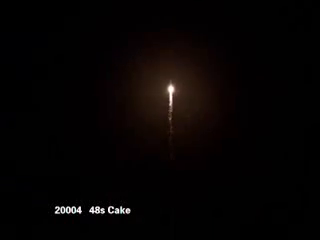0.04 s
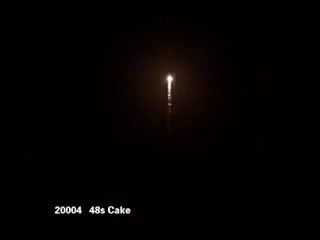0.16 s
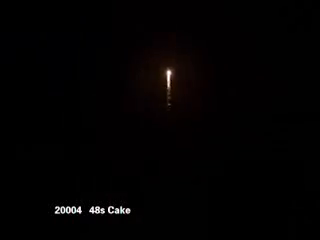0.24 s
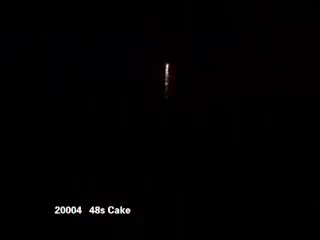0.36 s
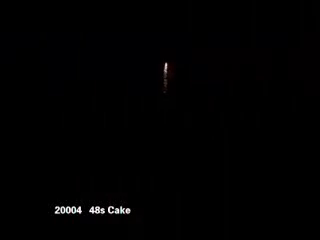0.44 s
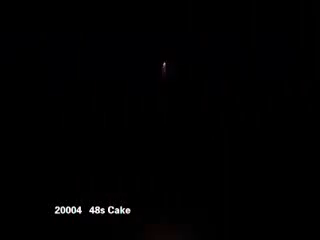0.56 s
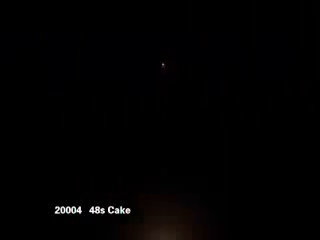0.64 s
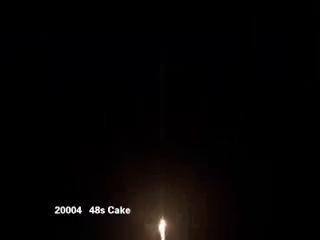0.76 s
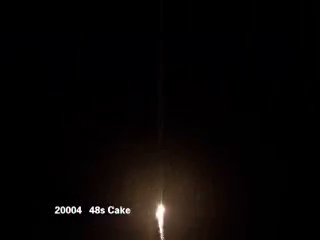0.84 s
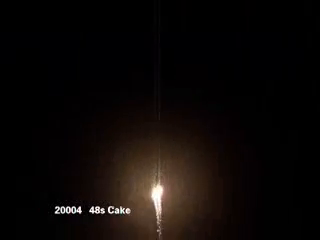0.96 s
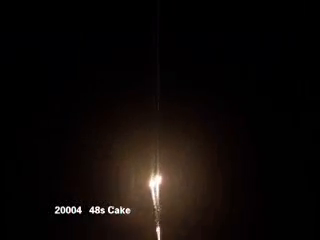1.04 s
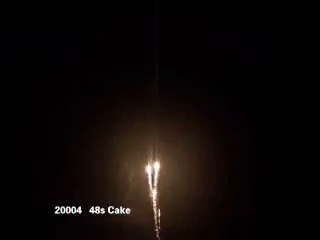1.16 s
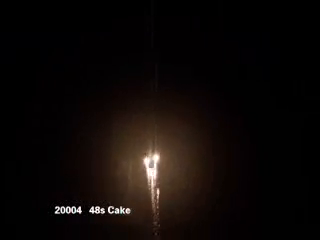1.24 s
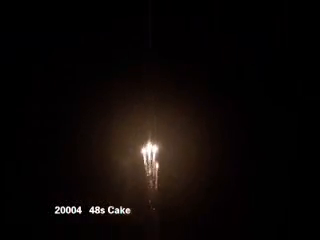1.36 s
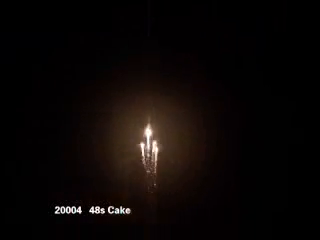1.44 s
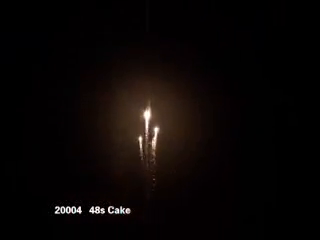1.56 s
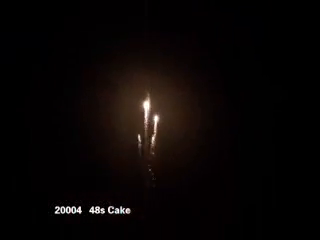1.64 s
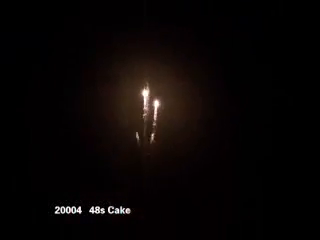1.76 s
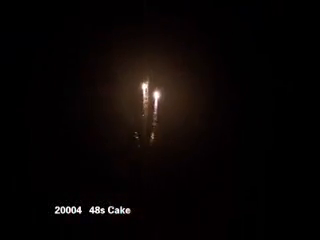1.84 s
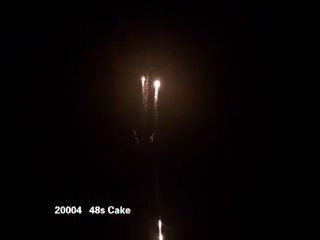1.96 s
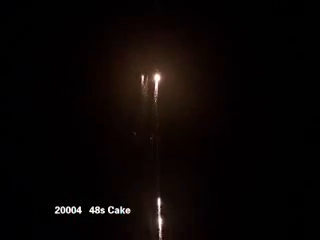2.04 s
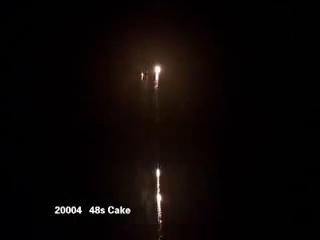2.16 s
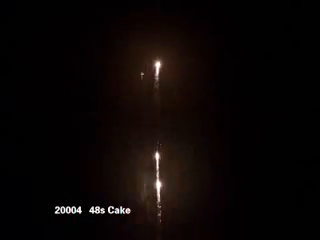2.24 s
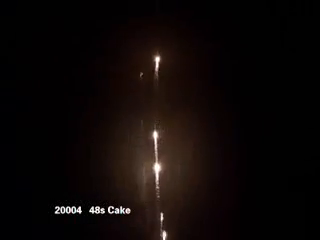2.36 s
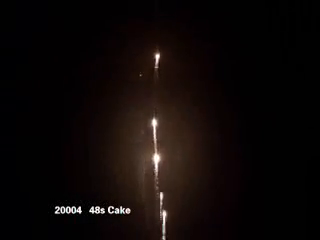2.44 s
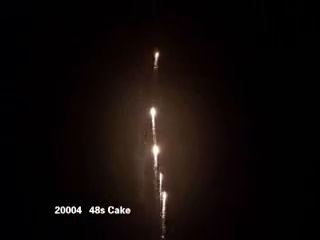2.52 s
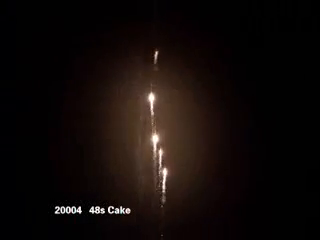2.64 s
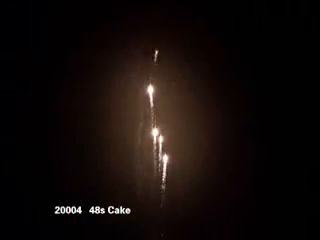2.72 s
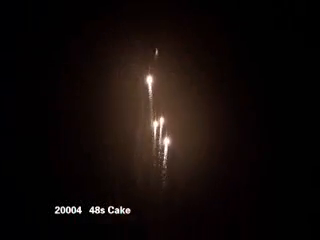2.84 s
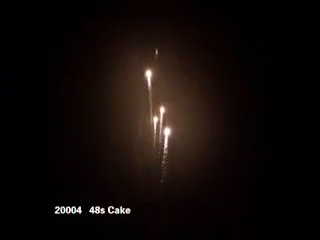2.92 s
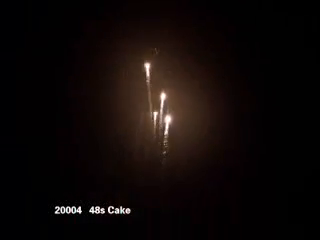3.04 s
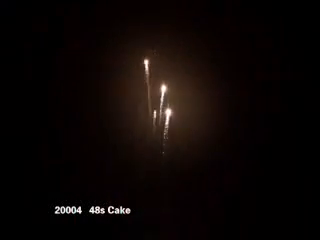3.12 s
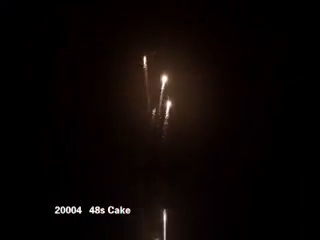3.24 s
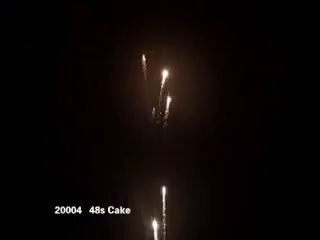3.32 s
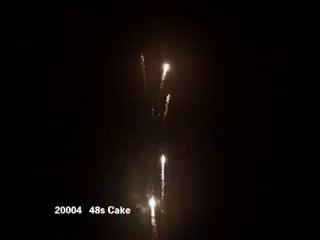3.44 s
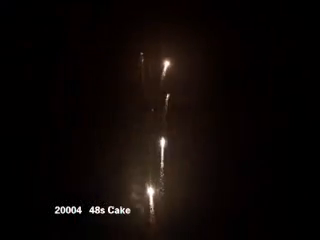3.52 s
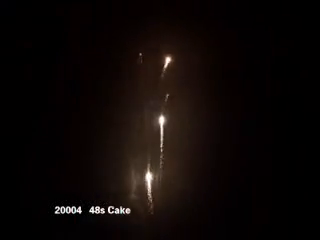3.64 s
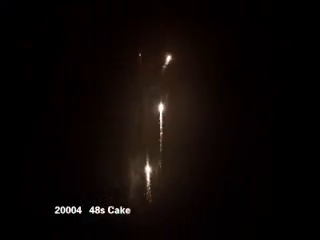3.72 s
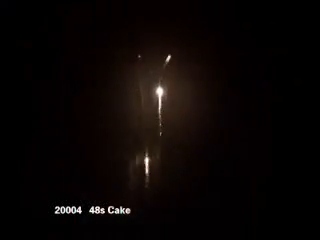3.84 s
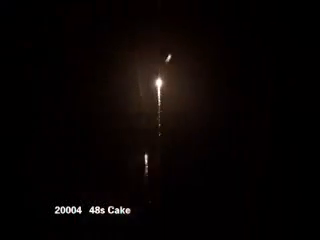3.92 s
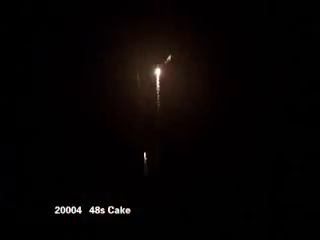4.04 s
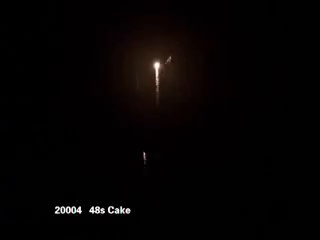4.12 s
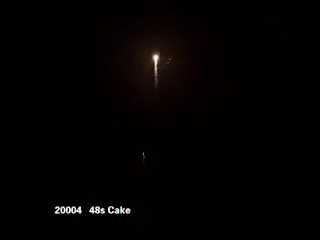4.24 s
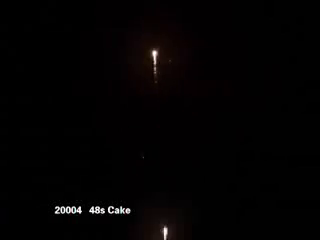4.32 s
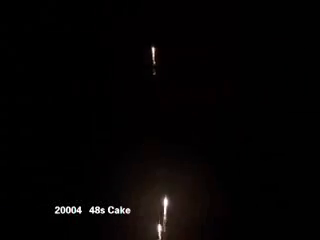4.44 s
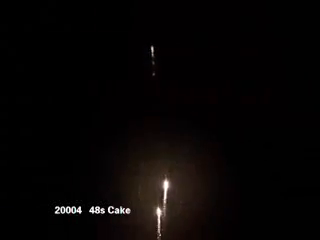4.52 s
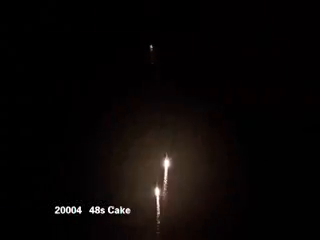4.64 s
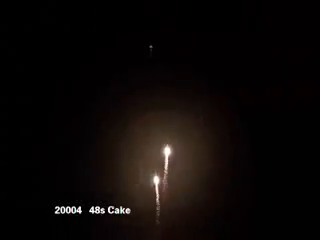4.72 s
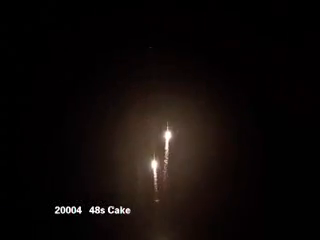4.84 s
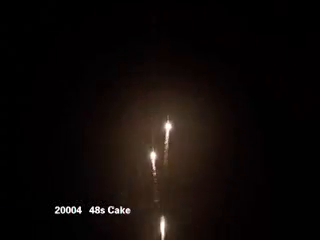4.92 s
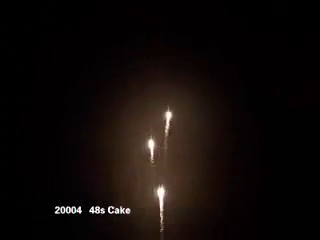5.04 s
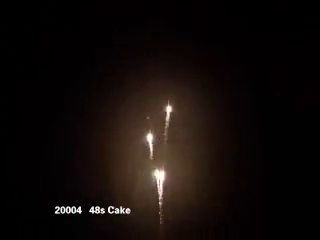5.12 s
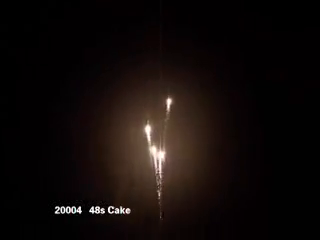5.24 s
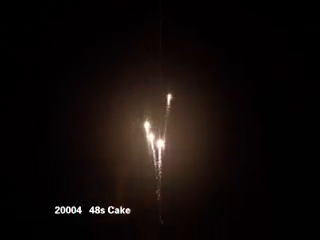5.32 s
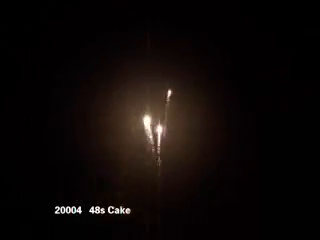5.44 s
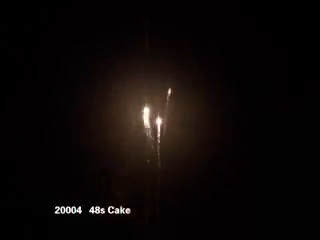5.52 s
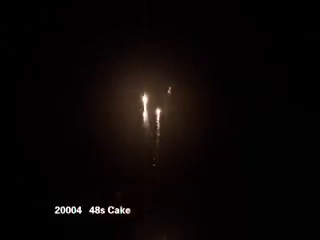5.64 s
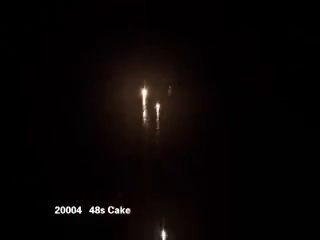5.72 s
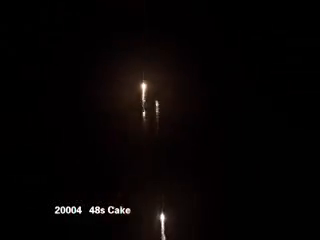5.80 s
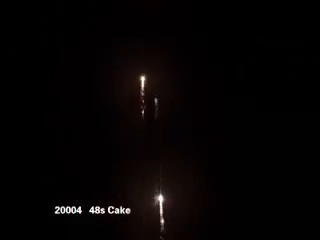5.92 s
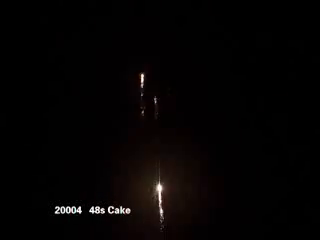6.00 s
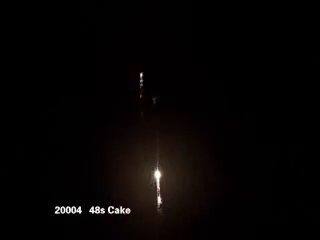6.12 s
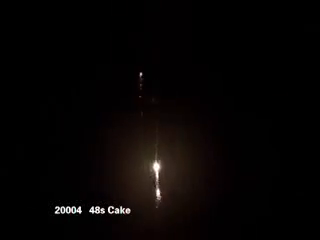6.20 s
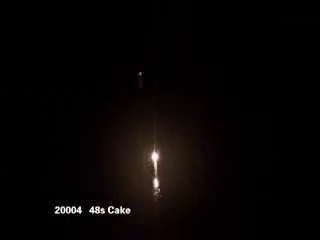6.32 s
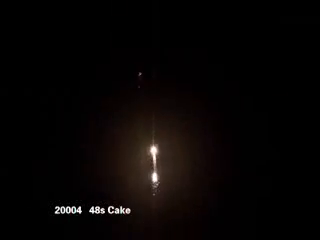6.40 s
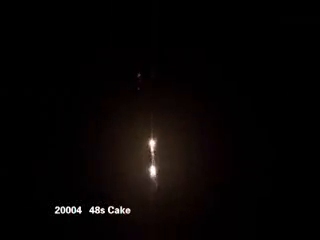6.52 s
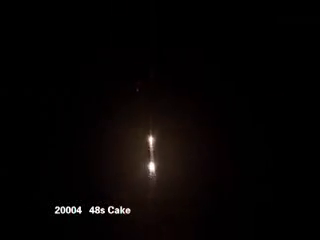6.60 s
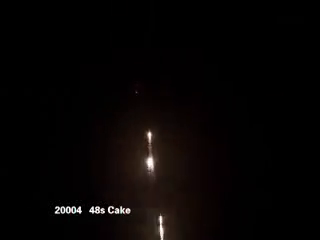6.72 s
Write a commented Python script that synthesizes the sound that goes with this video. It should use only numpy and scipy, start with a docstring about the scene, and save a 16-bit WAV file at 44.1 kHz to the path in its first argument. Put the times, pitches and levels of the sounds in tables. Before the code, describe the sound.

Outdoors among buildings, faint distant pops and a soft hiss give way to a firework cake launching comets. Nine quick pairs of sharp bangs come at uneven intervals, each loud enough to overload the microphone slightly and slap back off the walls. After each pair, the burning tails fizz quietly and fade, over a low wash of echoes and distant traffic.

```python
"""A firework cake fires comets at night among buildings. First, faint far pops and the hiss of a comet
already aloft, over a wash of echoes and distant traffic. From 0.67 s, nine quick pairs of lift charges:
each cracks, saturates the microphone and returns from the same near and far walls. After each pair the
burning tails hiss and fade as they climb. Two more far pops at 4.3 s; the last pair fires at 6.7 s."""
import sys
import numpy as np
from scipy import signal
from scipy.fft import rfft, irfft
from scipy.io import wavfile
from scipy.ndimage import uniform_filter1d

SR = 44100
rng = np.random.default_rng(int(sys.argv[2]) if len(sys.argv) > 2 else 0)


def materialize(psi):
    """Save the field psi as 16-bit PCM at rate SR to the path in sys.argv[1].

    A 1-D psi becomes a single channel; in a 2-D psi each row is a channel.
    """
    bounded = np.clip(np.atleast_2d(psi).T, -1, 1)
    quanta = np.round(bounded * 32767).astype(np.int16)
    wavfile.write(sys.argv[1], SR, quanta)


N = 298116


def lift_charges(far_wall_s=.05, bass_hz=500):
    """Each charge sends a blast and a crack along fixed paths; neighbouring tubes share much scatter."""
    # charges: (time [s], blast [dB], pitch [ratio], crack [dB], tilt [dB/octave], carry to walls [dB],
    # far crack [dB])
    charges = [(0.6677, 2, 0.9, 2, 4, -6, -8.5), (0.7102, 2.5, 1.06, 0.5, 4, 2.5, -5.5),
               (1.1634, 2, 1.02, 2.5, 7, 1.5, -1.5), (1.1913, -2, 0.91, -17, 9.5, 0.5, 0),
               (1.984, 1.5, 1.03, 2, -4, 0, 0.5), (2.0224, -0.5, 1, 3.5, 2, 1, 5.5),
               (2.4024, 1.5, 0.98, 6, 4, 1, 4.5), (2.4363, -3, 0.97, 2, 3, 0.5, -0.5),
               (3.2856, 2.5, 0.93, 2.5, 1, 0.5, -2), (3.3097, -2, 0.92, 2.5, -12, 2.5, 2.5),
               (4.3589, 2, 0.94, 3, 2, 0, -6.5), (4.3905, -1, 0.91, 0.5, 3.1, -2.5, -2),
               (4.949, 0.5, 0.92, 3, -2, -1, -2), (4.9787, -0.5, 0.95, -1.5, -4, -1, -1.5),
               (5.5909, 0, 0.72, 1.5, -11.5, -9, -22), (5.6221, -2.5, 0.94, 1, 5.5, -4.5, 0),
               (6.6907, 0, 0.99, 1.5, -3, -3, -16), (6.7276, -3, 0.85, 3.5, 0, 0, -6)]
    # direct blast: (ring [Hz], level [dB])
    direct = [(564, 3.5), (2800, -17), (151, -26.5)]
    # crack paths, direct and off hard surfaces: (delay [s], level [dB], far wall [0/1])
    crack_paths = [(0, -22, 0), (.0012, -30, 0), (.0720, -21, 1), (.0089, -33, 0), (.0766, -38, 1)]
    out, t = np.zeros(N), np.arange(SR // 2) / SR
    shared_scatter = scatter()
    paths = [(0, 1, db, hz) for hz, db in direct] + wall_echoes()
    sub_bass_swell = amp(-32) * np.sin(2 * np.pi * 4.5 * t) * np.exp(-t / .08)
    for s, blast_db, pitch, crack_db, tilt_db_per_oct, carry_db, far_crack_db in charges:
        for delay_s, gain, db, hz in paths:
            if delay_s < far_wall_s:  # a dull charge starves the bright paths
                charge_db = blast_db + tilt_db_per_oct * np.log2(max(hz, 300) / 560)
                pulse = blast(hz * pitch)
            else:  # distance rounds the front and stretches the ring
                charge_db = carry_db * min(hz / bass_hz, 1)  # bass carries even from a weak charge
                pulse = blast(hz * pitch, decay_cycles=.8 + .79 * delay_s,
                              rise_cycles=.066 + .51 * delay_s)
            add(out, s + delay_s, gain * amp(db + charge_db) * pulse)
        add(out, s, amp(blast_db - 18.5) * blast(hz=227, decay_cycles=1.38))  # the carton booms
        for delay_s, db, far in crack_paths:
            add(out, s + delay_s, amp(db + (far_crack_db if far else crack_db)) * crack(far))
        add(out, s, amp(.96 * carry_db) * (.79 * shared_scatter + .66 * scatter()))
        add(out, s, sub_bass_swell)
        add(out, s, amp(-37.5 + .71 * far_crack_db) * sizzle())
    return out


def blast(hz, decay_cycles=.7, rise_cycles=.075):
    """A steep pressure front that swings back and dies within a few cycles."""
    cycles = np.arange(1200) / SR * hz
    front = 1 - np.exp(-(cycles / rise_cycles) ** 2)
    return -front * np.exp(-cycles / decay_cycles) * np.cos(2 * np.pi * cycles)


def crack(far, spread_db=5.):
    """The shock and the gas behind it ring the tube mouth, never twice alike."""
    # tube mouth modes: (frequency [Hz], width [Hz], near level [dB], level off a far wall [dB])
    modes = [(1930, 820, 0, 0), (2580, 853, 3, -20), (5130, 1010, -12, -24), (7930, 3600, 7.5, 7),
             (10100, 14000, -11, -30)]
    t = np.arange(600) / SR
    drive = rng.standard_normal(len(t)) * np.exp(-t / .0015)
    drive[:3] -= [2.5, 5, 2.5]  # shock front
    ring = np.zeros(len(t))
    for hz, width_hz, near_db, far_db in modes:
        gain = amp((far_db if far else near_db) + spread_db * rng.standard_normal())
        envelope = (1 - np.exp(-t * hz / .91)) * np.exp(-np.pi * width_hz * t)
        ring += gain * envelope * np.sin(2 * np.pi * hz * t)
    return signal.fftconvolve(drive, ring)[:len(t)]


def sizzle(rise_s=.0019, decay_s=.042):
    """Hot sparks spray from the tube behind the star."""
    # spark spectrum: (frequency [Hz], level [dB])
    spectrum = [(3500, -30), (5500, -9), (7800, -1), (10500, -7), (13000, -28)]
    t = np.arange(8000) / SR
    spray = unit_rms(coloured(rng.standard_normal(len(t)), spectrum))
    return spray * np.minimum(t / rise_s, 1) * np.exp(-t / decay_s)


def wall_echoes(per_span=8):
    """Distinct reflections plus weaker ones at random delays, the same for every tube."""
    # reflecting surfaces: (delay [s], signed gain [ratio], level [dB], ring [Hz])
    walls = [(.0011, 0.95, -5.5, 700), (.0064, -1.11, -6, 482), (.0088, 1, -9.5, 786),
             (.0120, -1.1, -16, 1030), (.0201, 1, -18.5, 885), (.0719, 0.42, 2, 1100),
             (.0732, 0.81, -2.5, 974), (.0764, 0.62, -1.5, 1190), (.0805, -1, -11.5, 1020),
             (.181, 0.8, -17.5, 800), (.185, 1, -21.5, 1770), (.377, 0.67, -27, 635),
             (.379, -0.69, -30.5, 166.5), (.383, 0.8, -22.5, 770), (.8, 0.74, -28.5, 2700)]
    # spans of weak echoes: (start [s], end [s], start level [dB], fall [dB/s], low [Hz], high [Hz])
    clutter = [(.004, .04, -14, 148, 358, 1440), (.08, 0.229, -21.5, 62, 740, 1680)]
    echoes = list(walls)
    for start_s, end_s, start_db, fall_db_per_s, low_hz, high_hz in clutter:
        for k, (place, coin, tone) in enumerate(rng.random((per_span, 3))):
            lag_s = (k + place) / per_span * (end_s - start_s)
            hz = low_hz * (high_hz / low_hz) ** tone
            echoes.append((start_s + lag_s, np.sign(coin - .5), start_db - fall_db_per_s * lag_s, hz))
    return echoes


def scatter(echoes_per_s=650, spread_db=3.5, yard_db=-19.5, yard_t60_s=.33, street_db=-35):
    """Many small echoes: a quick yard decay over a long street decay whose treble dies first."""
    # scatter spectrum: (frequency [Hz], level [dB])
    spectrum = [(18, -50), (30, -64), (100, -4), (300, -3), (400, 0.5), (950, 4.5), (1300, -0.5), (1800, 0),
                (2900, -5.5), (3600, -10.5), (5500, -13.5), (8000, -15), (12000, -26.5), (14000, -70)]
    # street decay: (frequency [Hz], T60 [s])
    street_t60 = [(60, 2), (250, 1.28), (1000, 1.56), (3000, 1.44), (9000, 1.08)]
    # part left as single echoes: (frequency [Hz], gain [dB])
    sharp = [(2800, 1.5), (4200, -7), (14000, -27)]
    # part blurred by rough surfaces: (frequency [Hz], gain [dB])
    blurred = [(2800, -3), (4200, -1.5), (14000, 2.4)]
    t = np.arange(60000) / SR
    hits = rng.random(len(t)) < echoes_per_s / SR
    sizes = amp(spread_db * np.minimum(rng.exponential(1, len(t)), 4))
    polarity, haze = rng.standard_normal((2, len(t)))
    taps = unit_rms(hits * np.sign(polarity) * sizes)
    steady = unit_rms(coloured(coloured(taps, sharp) + coloured(haze, blurred), spectrum))
    hz, frame_s, bins = signal.stft(steady, SR, nperseg=256)
    decay = amp(-60 * frame_s / at_hz(street_t60, hz[:, None]))
    street = amp(street_db) * signal.istft(bins * decay, SR, nperseg=256)[1][:len(t)]
    yard = amp(yard_db - 60 * t / yard_t60_s) * steady[::-1]  # reversed to decorrelate
    onset = 1 - np.exp(-t / .004)
    return (yard + street) * onset


def comets(sparks_per_s=2500, spread_db=4., sputter_db=1.2):
    """Burning tails: a dense fizz of sparks that sputters as the stars tumble."""
    # hiss spectrum: (frequency [Hz], level [dB])
    spectrum = [(1000, 1), (2500, -1), (4500, -5.5), (8000, -2.5), (11500, -10), (12800, -13), (13300, -50)]
    sizes = amp(spread_db * np.minimum(rng.exponential(1, N), 4))
    hits = rng.random(N) < sparks_per_s / SR
    fizz = .42 * unit_rms(sizes * hits * rng.standard_normal(N)) + rng.standard_normal(N)
    sputter = unit_rms(uniform_filter1d(uniform_filter1d(rng.standard_normal(N), size=3000), size=3000))
    return tail_gain() * amp(sputter_db * sputter) * unit_rms(coloured(fizz, spectrum))


def tail_gain(catch_s=.051, ember_db=-69.5):
    """Tails catch, then fade as they climb; their powers add over a floor of far embers."""
    # tails, one row a pair: (launch [s], level [dB], fade [dB/s])
    tails = [(-.4, -51, 10), (.67, -56, 12), (1.16, -45.5, 15.5), (1.978, -47, 17), (2.399, -45.5, 14.5),
             (3.29, -42.5, 19), (4.36, -52, 4), (4.95, -47.5, 10.5), (5.59, -49.5, 8.5), (6.69, -52, 13)]
    power = amp(ember_db) ** 2
    for launch_s, db, fade_db_per_s in tails:
        age_s = np.maximum(np.arange(N) / SR - launch_s, 0)
        caught = 1 - np.exp(-(age_s / catch_s) ** 2)
        power += (caught * amp(db - fade_db_per_s * age_s)) ** 2
    return np.sqrt(power)


def far_pops():
    """Small distant reports, each trailing three reflections."""
    # reports: (time [s], level [dB], ring [Hz])
    reports = [(0.113, -34, 1500), (.200, -34, 2600), (0.579, -37.5, 398), (0.639, -45, 1000),
               (4.31, -32.5, 290), (4.346, -37, 300)]
    out = np.zeros(N)
    for s, db, hz in reports:
        for delay_s, gain in [(0, 1), (.007, .55), (.012, -.37), (.021, .77)]:
            add(out, s + delay_s, gain * amp(db) * blast(hz))
    return out


def wash(flutter_db=2.):
    """Lingering echoes and distant traffic, uneven in level."""
    # wash spectrum: (frequency [Hz], level [dB])
    spectrum = [(15, -34), (25, -5), (203, 1.5), (300, -5.5), (361, -2), (422, -3), (1110, -1.5),
                (4220, -16.5), (9500, -18), (11700, -20), (13000, -39)]
    # wash envelope: (time [s], level [dB])
    envelope = [(0, -52), (.15, -53), (.4, -55), (1., -47), (2., -50), (3.2, -49), (4.3, -51.5),
                (5.5, -49.5), (6.76, -59)]
    level_db = np.interp(np.arange(N) / SR, *np.transpose(envelope))
    flutter = unit_rms(uniform_filter1d(rng.standard_normal(N), size=500))
    return amp(level_db + flutter_db * flutter) * unit_rms(coloured(rng.standard_normal(N), spectrum))


def amp(db):
    return 10 ** (np.asarray(db) / 20)


def unit_rms(x):
    return x / np.sqrt(np.mean(x ** 2) + 1e-20)


def at_hz(table, hz):
    """Interpolates a table on a log-frequency axis."""
    knots_hz, values = np.transpose(table)
    return np.interp(np.log(hz + 1), np.log(knots_hz + 1), values)


def coloured(x, spectrum):
    """Filters by (frequency [Hz], gain [dB]) rows."""
    return irfft(rfft(x) * amp(at_hz(spectrum, np.fft.rfftfreq(len(x), 1 / SR))), len(x))


def add(mix, start_s, sound):
    part = mix[round(start_s * SR):][:len(sound)]
    part += sound[:len(part)]


def scene():
    """All sources straight ahead."""
    return np.tile(lift_charges() + far_pops() + comets() + wash(), (2, 1))


def record(dry, cutoff_hz=14300):
    """The input stage saturates; a faint, smeared stereo spread in the treble; then a low-pass."""
    # stereo side relative to mid: (frequency [Hz], gain [dB])
    width = [(500, -70), (1000, -82), (2000, -37), (4000, -23), (8000, -30.5), (12000, -19)]
    mid = 1.117 * np.tanh(1.025 * dry[0])
    mid = coloured(mid, [(11000, .5), (12500, -6.5), (14000, -3)])  # capsule roll-off
    smear = rng.standard_normal(900) * np.exp(-np.arange(900) / 300)
    side = coloured(signal.oaconvolve(mid, smear / np.linalg.norm(smear))[:N], width)
    stereo = np.clip([mid + side, mid - side], -.97, .97)
    lowpass = signal.firwin(511, cutoff_hz, window=("kaiser", 9), fs=SR)
    return signal.oaconvolve(stereo, lowpass[None], "same")


dry = scene()
out = record(dry)
materialize(out)
```